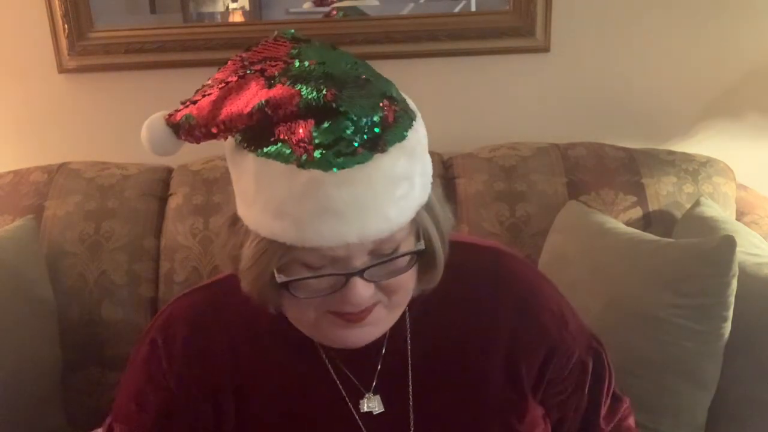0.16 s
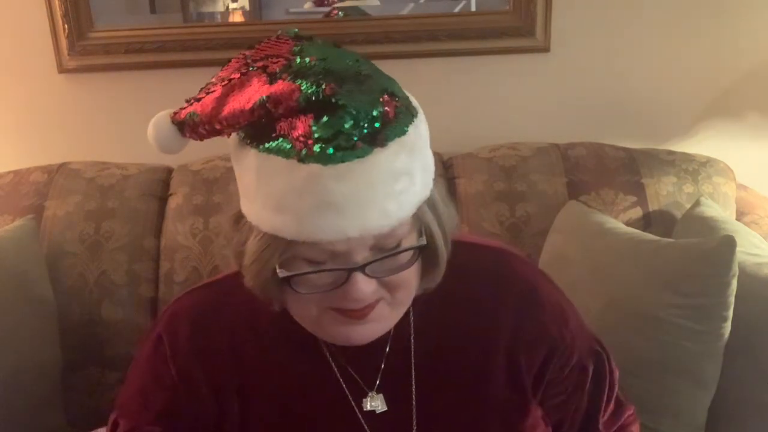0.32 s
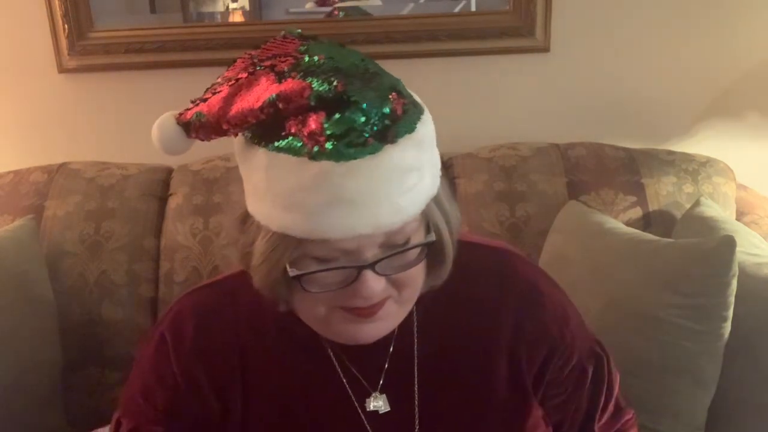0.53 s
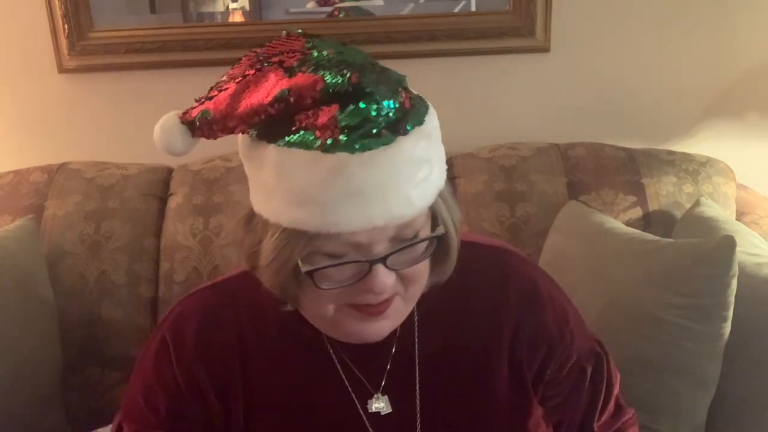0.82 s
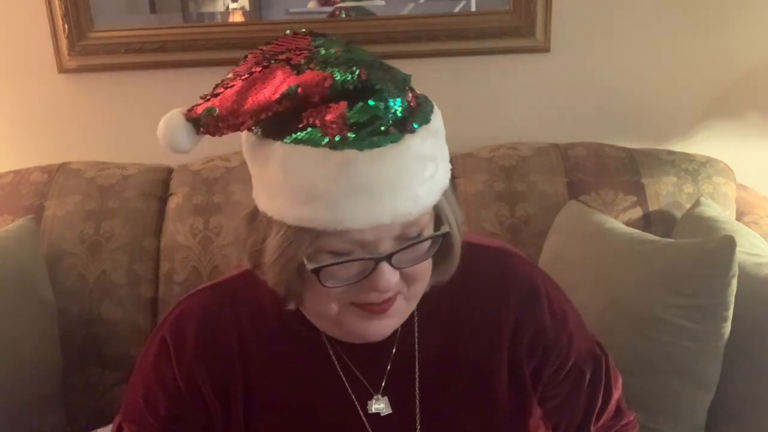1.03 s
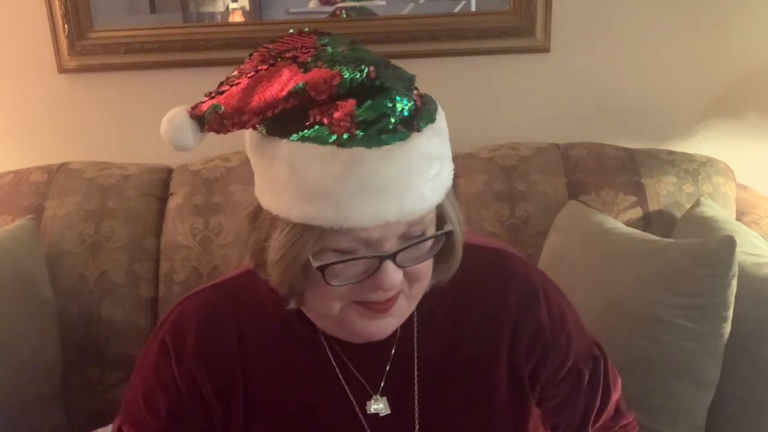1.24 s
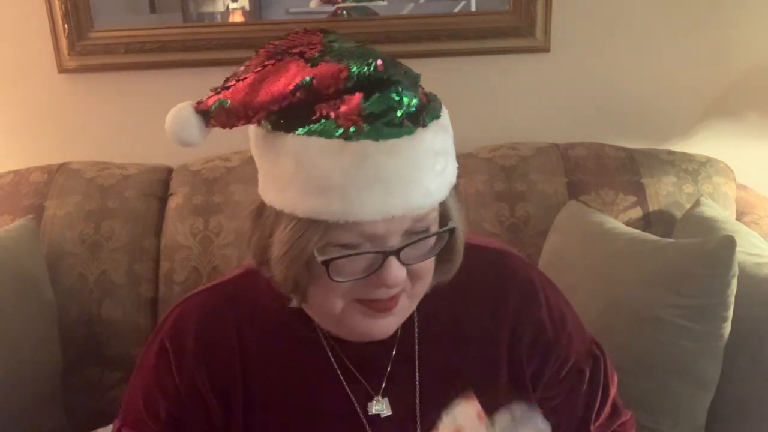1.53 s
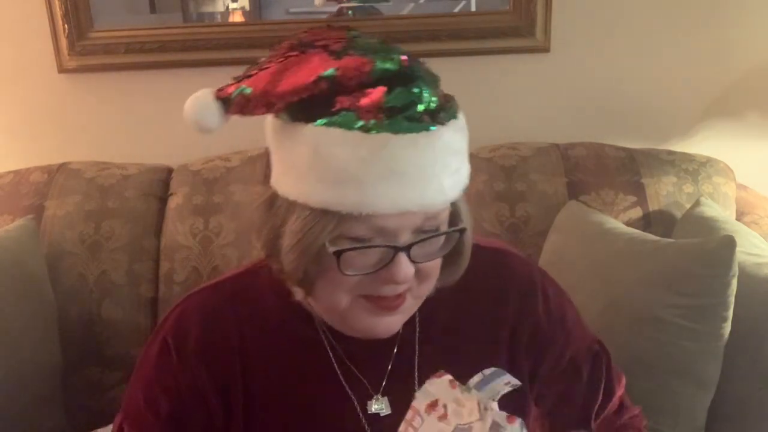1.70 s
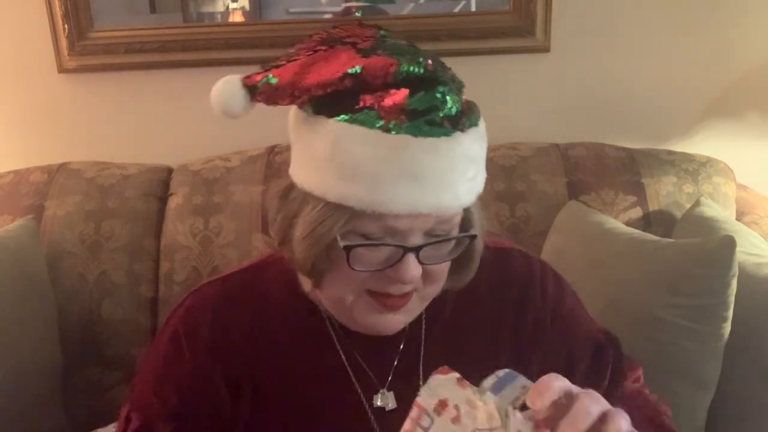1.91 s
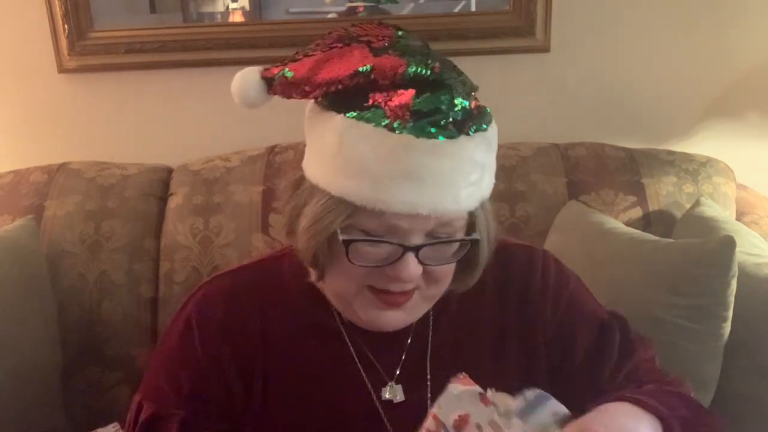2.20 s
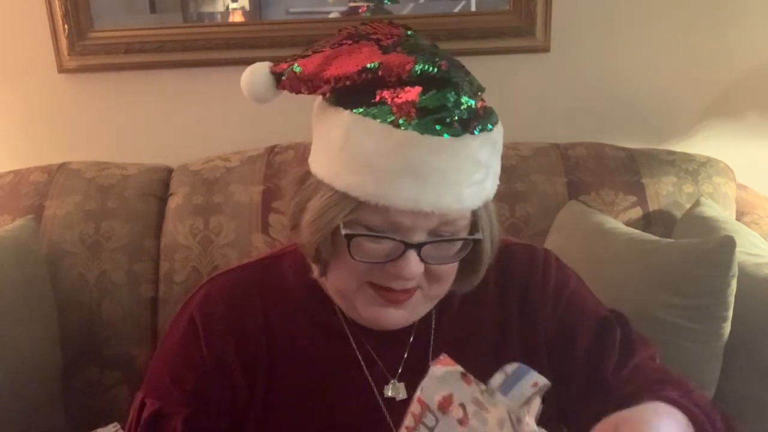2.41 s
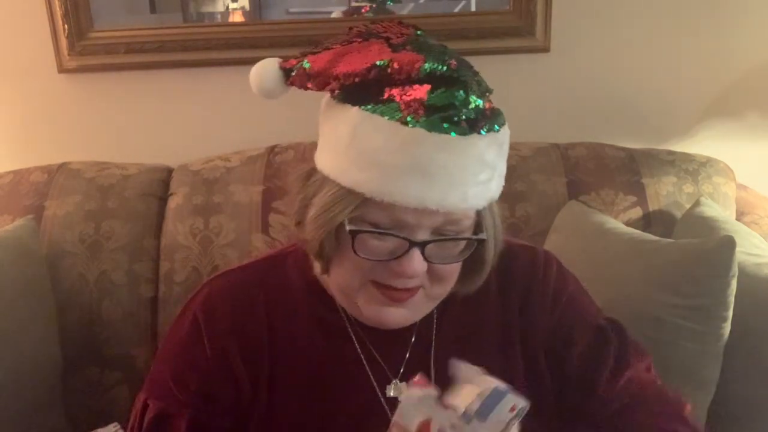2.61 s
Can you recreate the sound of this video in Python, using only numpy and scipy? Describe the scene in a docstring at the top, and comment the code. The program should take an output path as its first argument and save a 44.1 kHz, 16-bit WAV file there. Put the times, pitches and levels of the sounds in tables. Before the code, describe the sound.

Wrapping paper crackles and tears close by, slightly to the right, with sharp snaps and short rips in the first half second. Fingers knock a small hollow box at about 0.5 and 0.7 seconds. Fuller rustling swells from 0.8 to 1.5 seconds, then drops to faint tearing. From about 2.2 seconds crisp crackles and rips return, with another faint knock, fading by 2.7 seconds in a quiet living room.

```python
"""Wrapping paper is torn and crumpled by hand around a small box, close by.
The sheet rustles in swells of tiny creases, short rips run, and sharp folds snap.
Fingers knock the hollow box a few times, and a soft living room adds reverberation and faint room tone.
The paper lies to the right, so its sound arrives a little later on the left."""
import sys
import numpy as np
from scipy import signal
from scipy.fft import rfft, irfft, next_fast_len
from scipy.io import wavfile
from scipy.ndimage import uniform_filter1d, map_coordinates

SR = 44100
rng = np.random.default_rng(int(sys.argv[2]) if len(sys.argv) > 2 else 0)


def pcm_store(signal):
    """Save signal as 16-bit PCM."""
    levels = np.round(np.clip(np.atleast_2d(signal), -1, 1) * 32767)
    wavfile.write(sys.argv[1], SR, levels.astype(np.int16).T)


N = 121275
TIME = np.arange(N) / SR

# Spectra of the sheet's five bands. Each row: frequency in Hz, relative level in dB.
CRISP_BAND = [(1500, -25), (2300, -3), (3500, -4), (4500, -1), (6000, 0), (7500, -8), (9500, -30)]
SIZZLE_BAND = [(5000, -56), (7000, 11), (9000, 5.5), (11500, 9.5), (13500, 8), (15600, 4)]
BODY_BAND = [(450, -30), (850, -5), (1200, 0), (1800, -1), (2400, -8), (4000, -30)]
HOLLOW_BAND = [(150, -30), (340, -9), (580, 0), (820, -2), (1500, -30)]
HANDLING_BAND = [(35, -30), (68, -4), (100, -10), (160, 0), (230, -3), (400, -25), (800, -50)]
def paper():
    """Source and filter: creases, hiss and snaps excite the sheet, which radiates in five bands."""
    envelopes = rustle_envelopes()
    envelopes[:4] += rip_envelopes()
    grain = amp(-3) * creases()
    excitation = envelopes * (grain + [patchy_hiss() for _ in envelopes])
    excitation[:3] += snaps()
    bands = [CRISP_BAND, SIZZLE_BAND, BODY_BAND, HOLLOW_BAND, HANDLING_BAND]
    return sum(colour(x, band) for x, band in zip(excitation, bands))


# Each row: time in seconds, then the crisp, sizzle, body, hollow and handling levels in dB.
RUSTLE_LEVELS = [(0.0, -67.5, -69, -72, -66, -78.5), (0.231, -58, -63, -54.5, -64, -65),
                 (0.292, -57, -53, -58.5, -66, -75), (0.31, -59, -53.5, -52.5, -59.5, -59.5),
                 (0.4, -64.5, -62, -63.5, -70, -72), (0.44, -57, -56, -56.5, -63.5, -72),
                 (0.47, -56, -80, -50, -58, -50), (0.53, -47, -85, -50.5, -59, -50),
                 (0.555, -52, -63, -54.5, -62.5, -67), (0.6, -62, -67, -60, -67, -75),
                 (0.652, -61, -62.5, -70, -71.5, -73), (0.69, -66, -83, -60, -51.5, -54),
                 (0.751, -58.5, -61, -62.5, -59.5, -67), (0.83, -54.5, -47, -53, -67, -74),
                 (0.88, -58.5, -51.5, -52, -69, -69.5), (0.93, -58, -48, -51.5, -62, -77),
                 (0.971, -45, -45, -49.5, -52, -65), (1.059, -50, -46.5, -47.5, -53.5, -77),
                 (1.13, -58, -53, -55.5, -55.5, -72), (1.192, -64, -64, -62.5, -71, -81),
                 (1.26, -47, -44, -48, -47.5, -70), (1.31, -45, -41, -46.5, -49.5, -68),
                 (1.391, -44.5, -43.5, -45, -44, -53.5), (1.445, -49.5, -50, -54.5, -55.5, -65.5),
                 (1.491, -53.5, -58, -48, -57, -69), (1.55, -72.5, -79.5, -77.5, -72.5, -76.5),
                 (1.85, -74, -79.5, -69, -77, -80.5), (2.07, -75, -72, -68.5, -70.5, -73.5),
                 (2.19, -63.5, -61, -68, -67, -76.5), (2.24, -60, -63.5, -67, -59, -70),
                 (2.469, -53.5, -49.5, -61, -71, -81.5), (2.57, -56.5, -56.5, -57, -79, -73),
                 (2.64, -66, -68, -79, -74, -88), (2.75, -84, -79, -69.5, -77, -79)]
def rustle_envelopes(sway_db=1.2):
    """Amplitude modulation: as the sheet moves, its bands swell and sway, together and separately."""
    times, *levels = np.transpose(RUSTLE_LEVELS)
    common_db = sway_db * wobble(34.14)
    return amp(common_db + [np.interp(TIME, times, db) + sway_db * wobble(24.68) for db in levels])


def creases(per_second=1500, spread_db=5, clump_db=2.5, decay_cycles=1.6):
    """Damped oscillation: each tiny crease rings briefly at its own pitch and size."""
    when, pitch, rarity = rng.random((int(N / SR * per_second), 3)).T
    onset = (when * N).astype(int)
    hz = 400 * (15000 / 400) ** pitch
    size = hz * amp(-spread_db * np.log(rarity + .03) + clump_db * wobble(39.3)[onset])
    age = np.arange(200)
    cycles = hz[:, None] * age / SR
    rings = size[:, None] * np.sin(2 * np.pi * cycles) * np.exp(-cycles / decay_cycles)
    return unit(np.bincount((onset[:, None] + age).ravel(), rings.ravel())[:N])


def patchy_hiss(spread_db=3.0):
    """Random modulation: white noise flickers in patches of time and frequency."""
    spectra = signal.stft(rng.standard_normal(N), nperseg=256)[2]
    patches = uniform_filter1d(uniform_filter1d(rng.standard_normal(spectra.shape), 5, 0), 6, 1)
    return unit(signal.istft(spectra * amp(spread_db * unit(patches)), nperseg=256)[1][:N])


# Each row: start in seconds, length in seconds, crisp level in dB, body level relative to it in dB.
RIPS = [(0.105, 0.04, -57, -13), (0.438, 0.004, -37, -12), (0.452, 0.0077, -34.5, -10),
        (0.482, 0.017, -34.5, -12.5), (0.524, 0.015, -48, -19), (1.588, 0.056, -90, 23),
        (1.7, 0.013, -83, 19), (1.775, 0.048, -70.5, -9.5), (1.839, 0.043, -69.5, 6),
        (2.003, 0.031, -67, -21), (2.028, 0.042, -66, 4.5), (2.069, 0.036, -64, 4),
        (2.26, 0.031, -65.5, 11.5), (2.204, 0.028, -73, 18), (2.33, 0.019, -53.5, 1),
        (2.355, 0.017, -45, -5.5), (2.557, 0.0084, -53.5, 1.5)]
def rip_envelopes(rise_s=.0025, t60=.029, sizzle_db=5, hollow_below_body_db=8.5):
    """Running fracture: a tear drives the upper four bands while it lasts, then dies away."""
    envelopes = np.zeros((4, N))
    for start, length, db, body_db in RIPS:
        age = TIME - start
        shape = amp(db - 60 * np.maximum(age - length, 0) / t60) * np.clip(age / rise_s, 0, 1)
        envelopes += shape * amp([[0], [sizzle_db], [body_db], [body_db - hollow_below_body_db]])
    return envelopes


# Each row: time in seconds, crisp level in dB, then sizzle and body levels relative to it in dB.
FOLD_SNAPS = [(0.0153, -39, 10, -20), (0.031, -35.5, 1.5, 5), (0.112, -24, 3, -5.5), (0.1224, -30, 3, -18),
              (0.1405, -21, -5, -27), (0.153, -21.5, -4, -40), (0.208, -25, 7.5, -15),
              (0.2298, -32, 10, -14), (0.2385, -29, 8, -7), (0.269, -40, 4, -21), (0.313, -24, -1.5, -6.5),
              (0.319, -34, 4, -20), (0.3278, -28, 9, -22), (0.342, -29, 9, -26), (0.3467, -26, 1, -22),
              (0.353, -35, -5, 12.5), (0.357, -42, -5, 16), (0.3907, -37, -9.5, -15.5),
              (0.4293, -17, 8, -11), (0.4432, -16, 16, -16), (0.4825, -24, 12, -11), (0.596, -38.5, 9, 6),
              (0.676, -20.5, 0, -28), (0.761, -48, 11, -6), (0.773, -32.5, 4.5, -7), (0.863, -32, 6, -12),
              (0.918, -36.5, 2, 1), (0.948, -24, -4, 2), (0.9908, -20, -4, -13), (1.112, -28.5, 2, -19),
              (1.2137, -41.5, 5, 14), (1.227, -39.5, 17, -7), (1.259, -35, -4, -13), (1.3058, -27, 2, -3),
              (1.754, -52, -7.5, -26), (1.845, -30, -20, -9), (1.8574, -64, -10, -10),
              (2.1654, -33, 6.5, -8), (2.271, -48, -6, -18), (2.2943, -29, 9.5, -24), (2.3209, -27, 5, -2),
              (2.3477, -34, 10, -9), (2.4, -30, 8, -10), (2.4424, -33, 6, -32), (2.4761, -20.5, 11.5, -10),
              (2.491, -22, -11, -8.5), (2.555, -38, 8, -8), (2.572, -31, 6, -20), (2.5797, -37.5, 17, -12),
              (2.6024, -38, 7.5, 1), (2.6521, -30.5, 7.5, -20), (2.6577, -39.5, -5, 7.5)]
def snaps(lead_in_s=.01, lead_in_t60=.012, flutter_t60=.019):
    """Impulsive excitation: a fold snaps and briefly flutters; a faint hiss swells just before."""
    crack_t60, rise_s = [[.0025], [.0025], [.014]], [[.0002], [.0002], [.001]]  # crisp, sizzle, body
    age = TIME[:SR // 5] - lead_in_s
    after = np.maximum(age, 0)
    lead_in = (age < 0) * amp(-26 + 60 * np.minimum(age, 0) / lead_in_t60)
    crack = amp(-60 * after / crack_t60)
    flutter = amp(-25.5 - 60 * after / flutter_t60)
    envelope = lead_in + (crack + flutter) * (1 - np.exp(-after / rise_s))
    bands = np.zeros((3, N))
    for time, db, sizzle_db, body_db in FOLD_SNAPS:
        burst = envelope * rng.standard_normal(len(age))
        burst *= np.linalg.norm(envelope[0]) / np.linalg.norm(burst, axis=1)[:, None]  # equal energies
        span = bands[:, round((time - lead_in_s) * SR):][:, :len(age)]
        span += amp(db) * amp([[0], [sizzle_db], [body_db]]) * burst[:, :span.shape[1]]
    return bands


# Each row: start in seconds, ring level in dB, thump level in dB.
BOX_KNOCKS = [(.4945, -36.5, -39), (0.6781, -28.5, -52), (2.338, -43.5, -72)]
# Each row: frequency in Hz, relative level in dB, time to decay by 60 dB in seconds.
BOX_MODES = [(220, -12, 0.14), (532, 6.5, 0.015), (743, 14.5, 0.015), (875, 2.5, 0.031), (1184, 6, 0.029),
             (1790, -5.5, 0.055)]
def box_knocks(thump_hz=154, thump_t60=.072, rise_s=.00095):
    """Modal resonance: the hollow box rings under the fingers and thumps as it gives way."""
    start, ring_db, thump_db = np.transpose(BOX_KNOCKS)[..., None]
    age = np.maximum(TIME - start, 0)
    mode = lambda hz, db, t60: amp(db - 60 * age / t60) * np.sin(2 * np.pi * hz * age)
    ring = sum(mode(hz, db + rng.normal(0, .72, start.shape), t60) for hz, db, t60 in BOX_MODES)
    thump = mode(thump_hz, thump_db, thump_t60)
    return ((amp(ring_db) * ring + thump) * (1 - np.exp(-age / rise_s))).sum(axis=0)


# Decay of the room, and of scatter off hands and box. Each row: frequency in Hz, T60 in seconds.
ROOM_DECAY = [(200, 0.037), (2000, 0.31), (10000, 0.13)]
SCATTER_DECAY = [(200, 0.035), (8000, 0.016)]
def reflections(x, decays, size, hop=1500):
    """Diffuse reflection: each moment gets its own noise tail, decaying at a rate set by frequency."""
    out, window = np.zeros(N + size + 3 * hop), signal.get_window("hann", 2 * hop)
    x = np.pad(x, (hop, 2 * hop))
    hz, age, spectra = signal.stft(rng.standard_normal((N // hop + 1, size)), SR, nperseg=128)
    decay = amp(-60 * age / along(decays, hz)[:, None])
    tails = signal.istft(spectra * decay, SR, nperseg=128)[1][:, :size]
    for k, tail in enumerate(tails):
        piece = signal.fftconvolve(np.sqrt(window) * x[k * hop:][:2 * hop], tail / np.linalg.norm(tail))
        out[k * hop:][:len(piece)] += piece
    return out[hop:hop + N]


# Each row: frequency in Hz, relative level in dB.
ROOM_TONE_SPECTRUM = [(25, -44), (62, 18), (100, -10), (300, -25), (1000, -26), (3000, -23), (8000, -57),
                      (15000, -59)]
def room_tone(level_db=-76):
    """Stationary noise: a faint, low rumble fills the room."""
    return amp(level_db) * colour(rng.standard_normal(N), ROOM_TONE_SPECTRUM)


# Each row: frequency in Hz, left-right likeness from 0 to 1.
STEREO_COHERENCE = [(100, .85), (700, .82), (1700, .68), (2700, .5), (3500, .35), (5000, .55), (6400, .5),
                    (7500, .92), (9400, .98), (10500, .85), (12300, .85), (13500, .96)]
# Each row: frequency in Hz, phase of left relative to right in radians.
STEREO_PHASE = [(60, 0), (780, -1.2), (1810, -1.5), (2760, -3.1), (4220, -5.6), (5770, -6.8), (7100, -9.4),
                (10200, -9.5), (11000, -10.5), (12500, -12.5), (16000, -12.6)]
# Each row: frequency in Hz, level of left relative to right in dB.
STEREO_BALANCE = [(60, -3), (160, 3), (350, 5), (740, 0), (15000, 0)]
def stereo_image(shared, scattered):
    """Partial coherence: left-right likeness and phase vary by frequency; the top treble is centred."""
    side = np.array([[1], [-1]])  # left, right
    mix_angle = lambda hz: np.arccos(np.clip(along(STEREO_COHERENCE, hz), 0, 1)) / 2
    pan = lambda hz: amp(side * along(STEREO_BALANCE, hz) / 2) * np.exp(.5j * side * along(STEREO_PHASE, hz))
    return (filtered(shared, lambda hz: pan(hz) * np.cos(mix_angle(hz)))
            + filtered(scattered, lambda hz: side * pan(hz) * np.sin(mix_angle(hz))))


def amp(db):
    """Decibel law: 20 dB is a tenfold amplitude."""
    return 10 ** (np.asarray(db) / 20)


def unit(x):
    """Normalisation to unit RMS."""
    return x / np.sqrt(np.mean(x ** 2) + 1e-20)


def along(points, hz):
    """Interpolation on a logarithmic frequency axis."""
    frequencies, values = np.transpose(points)
    return np.interp(np.log(hz + 1), np.log(frequencies + 1), values)


def wobble(rate):
    """Smooth noise: a spline through `rate` random knots a second."""
    return map_coordinates(rng.standard_normal(int(N * rate / SR) + 4), [TIME * rate])


def filtered(x, response):
    """Linear filtering: the spectrum is multiplied by a complex response."""
    size = next_fast_len(N + SR // 2)
    return irfft(rfft(x, size) * response(np.fft.rfftfreq(size, 1 / SR)), size)[..., :N]


def colour(x, spectrum):
    """Minimum-phase filtering that keeps the power of white noise."""
    cepstrum = irfft(np.log(amp(along(spectrum, np.fft.rfftfreq(4096, 1 / SR)))))
    cepstrum[1:2048] *= 2
    cepstrum[2049:] = 0
    impulse = irfft(np.exp(rfft(cepstrum)))
    return signal.fftconvolve(x, impulse / np.linalg.norm(impulse))[:N]


def scene(reverb_db=-9):
    """Superposition: paper, box, reflections and room tone add in two channels."""
    direct = paper() + box_knocks()
    shared_tone, scattered_tone = room_tone(), room_tone()
    reverb = lambda: amp(reverb_db) * reflections(direct, ROOM_DECAY, size=8192)
    shared = direct + reverb() + shared_tone
    scattered = reflections(direct, SCATTER_DECAY, size=2048) + reverb() + scattered_tone
    return stereo_image(shared, scattered)


def record(dry):
    """Band limiting: a steep low-pass removes the highest treble."""
    cutoff_hz = 15800
    return filtered(dry, lambda hz: 1 / (1 + (hz / cutoff_hz) ** 160))


dry = scene()
out = record(dry)
pcm_store(out)
```